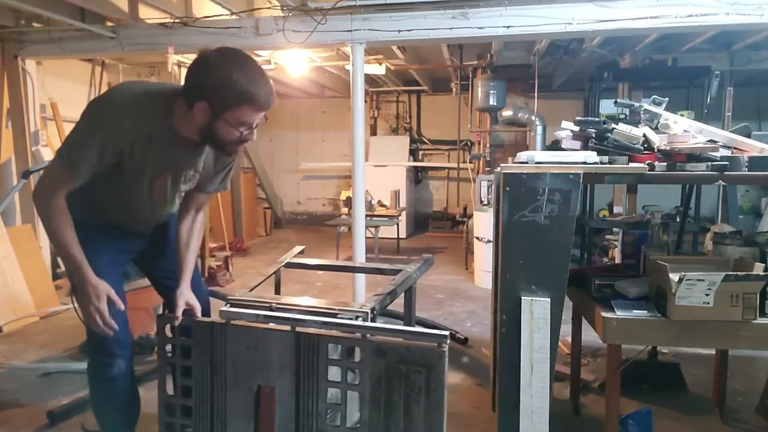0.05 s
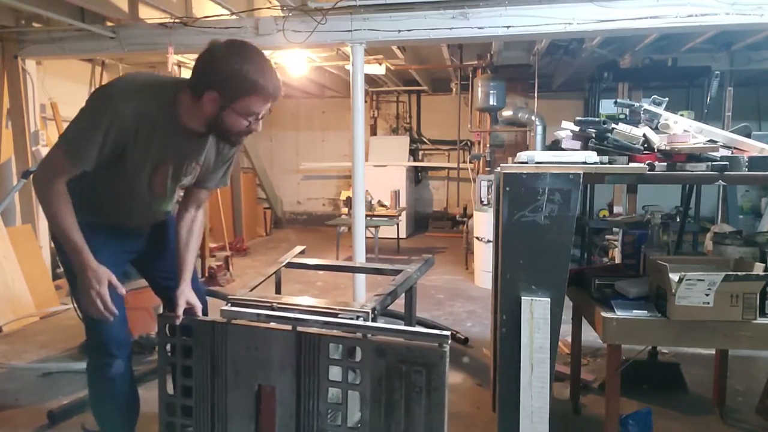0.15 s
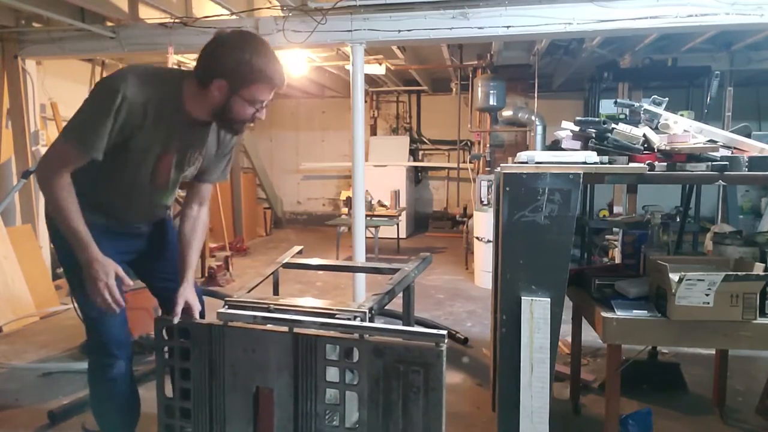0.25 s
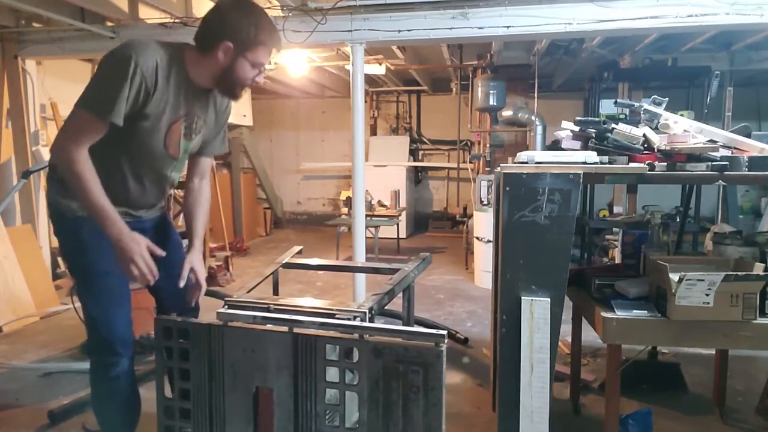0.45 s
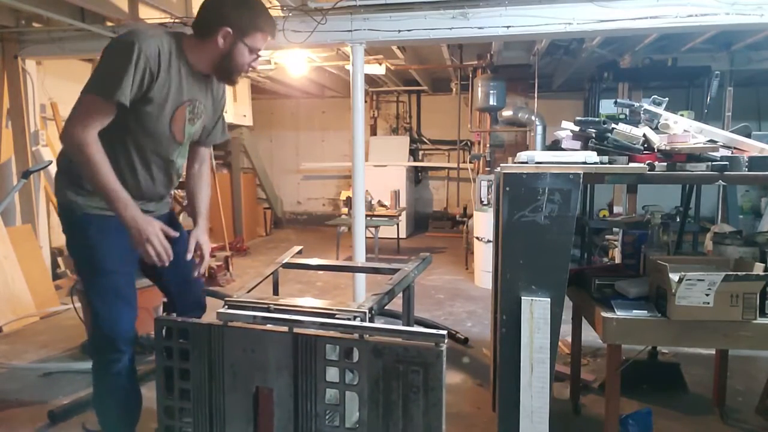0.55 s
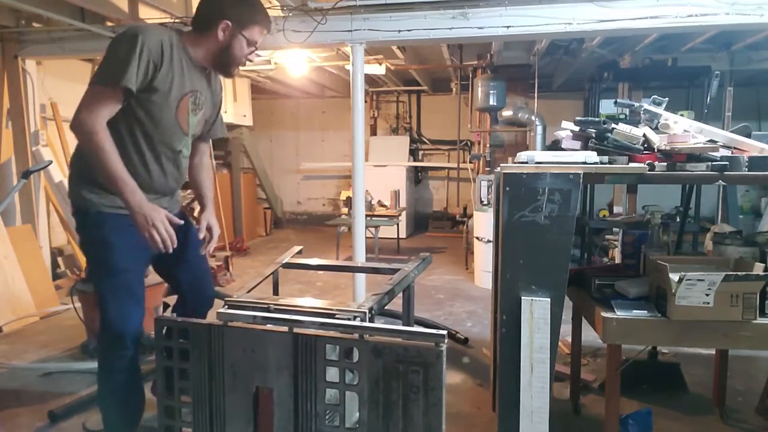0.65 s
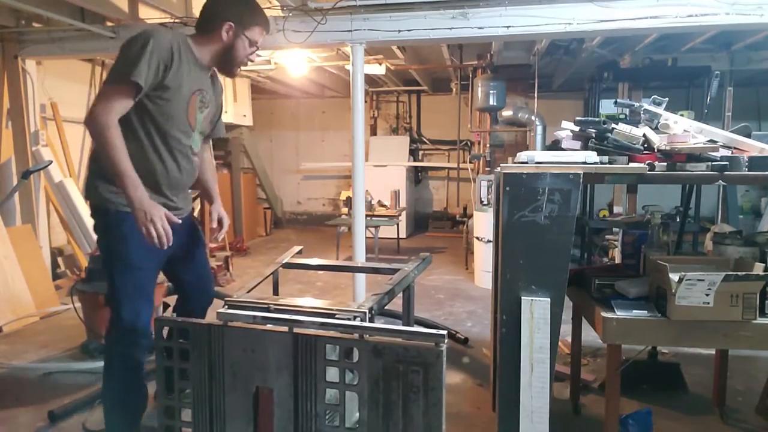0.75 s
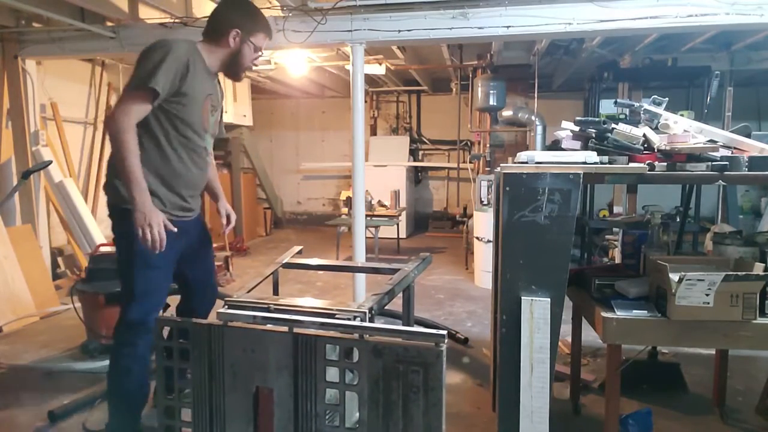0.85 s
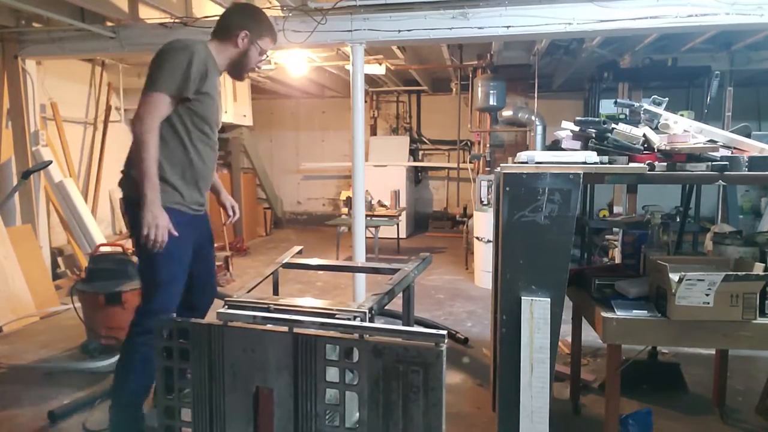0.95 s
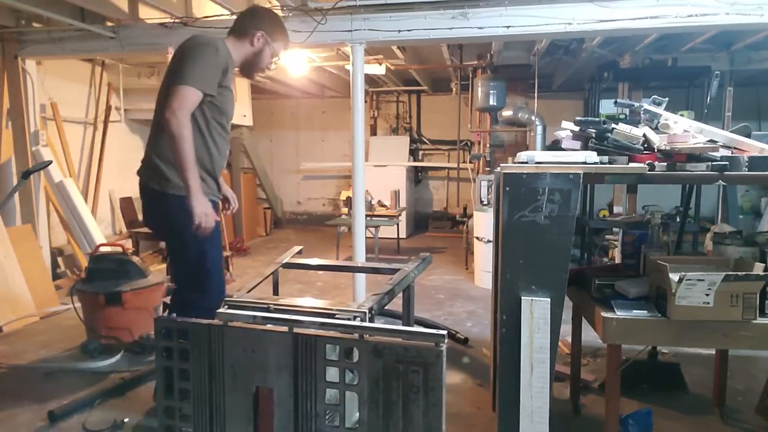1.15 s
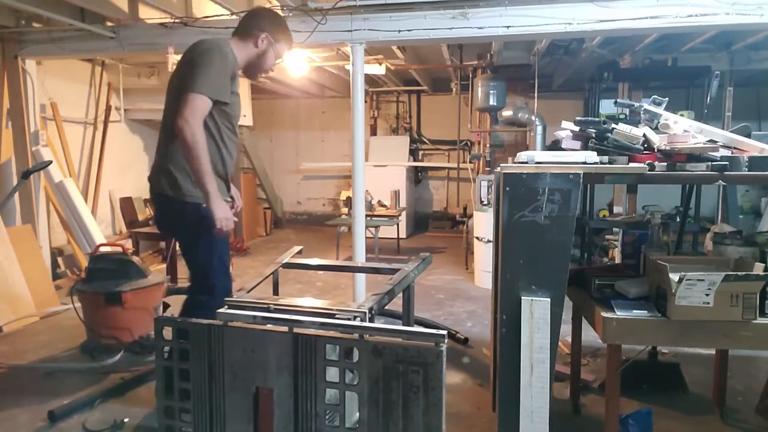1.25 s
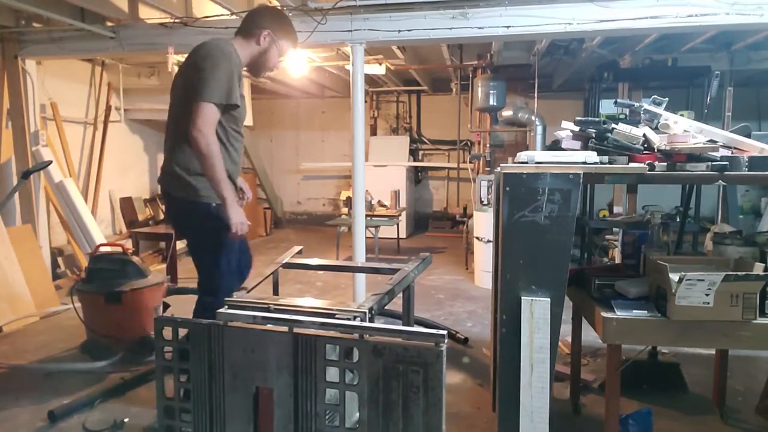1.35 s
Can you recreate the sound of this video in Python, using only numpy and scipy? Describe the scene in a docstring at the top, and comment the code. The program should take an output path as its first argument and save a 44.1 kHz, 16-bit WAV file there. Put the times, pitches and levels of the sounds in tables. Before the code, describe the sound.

A heavy steel frame slams onto a concrete floor with a boom and ringing clash.

```python
"""A heavy steel machine frame is let down on a basement workshop's concrete floor, two metres away.
It knocks, catches on an edge and slams flat: the body booms, the panels clash and the low room rings on.
A step and a shoe scuff follow, then a lighter clack of metal from further off.
The stereo microphone hears it all a little to the left, over faint room noise."""
import sys
import numpy as np
from scipy import signal
from scipy.fft import rfft, irfft
from scipy.io import wavfile

SR = 44100
rng = np.random.default_rng(int(sys.argv[2]) if len(sys.argv) > 2 else 0)


def log_audio(samples):
    """Write samples as a 16-bit WAV file to the path given in sys.argv[1]."""
    # one column per channel
    frames = np.atleast_2d(samples).T
    # limit to full scale, then quantise
    limited = np.clip(frames, -1, 1)
    pcm = np.round(limited * 32767).astype(np.int16)
    wavfile.write(sys.argv[1], SR, pcm)


N = 61739

# reverberation of the basement: band_hz, t60_s
ROOM_DECAY = [(60, 0.73), (250, 0.64), (1000, 0.52), (3000, 0.49), (15000, 0.36)]
# stereo width at the microphone: frequency_hz, side_over_mid_db
STEREO_WIDTH = [(60, -25.5), (260, -13.5), (500, -6.5), (1000, -1)]


def undb(db):
    """Decibels to gain."""
    return 10 ** (np.asarray(db) / 20)


def level(x, db):
    """Scale to an rms level; levels set before this are only relative."""
    return x * undb(db) / np.sqrt(np.mean(x ** 2))


def lookup(table, hz):
    """Read a table on a log-frequency axis."""
    freqs, values = np.array(table, float).T
    return np.interp(np.log(np.maximum(hz, 1)), np.log(freqs), values)


def fade(t60):
    """Exponential decay, 60 dB in t60 seconds."""
    return np.exp(-np.log(1000) * np.arange(N) / SR / max(t60, 1e-3))


def rise(seconds):
    """Build-up from silence to 1."""
    return 1 - np.exp(-np.arange(N) / SR / max(seconds, 1e-5))


def swell(middle_s, width_s):
    """A smooth rise and fall."""
    return np.exp(-.5 * ((np.arange(N) / SR - middle_s) / width_s) ** 2)


def place(x, start_s):
    """Shift a sound to its start; a negative time cuts off its beginning."""
    shift = int(start_s * SR)
    late, early = max(shift, 0), max(-shift, 0)
    padding = [(0, 0)] * (x.ndim - 1) + [(late, early)]
    return np.pad(x, padding)[..., early:early + N]


def through(x, response):
    """Convolve with an impulse response, channel by channel."""
    return irfft(rfft(x, 2 ** 17) * rfft(response, 2 ** 17))[..., :N]


def colour(x, spectrum, scatter_db=0):
    """Causal filter with the given spectrum; scatter_db adds a metal part's crowded peaks and dips."""
    size, peak_spacing_hz = 8192, 45
    hz = np.fft.rfftfreq(size, 1 / SR)
    grid = np.arange(0, SR / 2, peak_spacing_hz)
    peaks = np.interp(hz, grid, rng.standard_normal(len(grid))) * np.minimum(hz / 1000, 1)
    cepstrum = irfft(np.log(undb(lookup(spectrum, hz) + scatter_db * peaks)))
    cepstrum[1:size // 2] *= 2  # fold to minimum phase
    cepstrum[size // 2 + 1:] = 0
    return through(x, irfft(np.exp(rfft(cepstrum))))


def soften(x, hz):
    """A softer contact leaves out the highs."""
    return signal.sosfilt(signal.butter(2, min(hz, SR / 2 - 1000), fs=SR, output="sos"), x + 1e-18)


def resonance(x, hz, relative_width=0.22):
    """Band-pass around one resonance, gain 1 at its centre."""
    return signal.lfilter(*signal.iirpeak(hz, 1 / relative_width, fs=SR), x)


def ring(modes, rise_cycles=0):
    """Decaying sines that build up over some cycles; the high ones reach the two sides out of step."""
    t, out = np.arange(N) / SR, 0
    for hz, db, t60 in modes:
        skew = rng.uniform(1, 2) * np.pi / 6 * rng.choice([-1, 1]) * undb(lookup(STEREO_WIDTH, hz))
        tone = np.sin(2 * np.pi * hz * t + np.array([[skew], [-skew]]))
        out = out + undb(db) * rise(rise_cycles / hz) * fade(t60) * tone
    return out


def diffuse():
    """Stereo noise, alike in the bass and unrelated in the treble."""
    mid, side = rfft(rng.standard_normal((2, N)))
    width = undb(lookup(STEREO_WIDTH, np.fft.rfftfreq(N, 1 / SR)))
    return irfft((mid + np.array([[1], [-1]]) * width * side) / np.sqrt(1 + width ** 2), N)


def room_bands():
    """Diffuse noise split into the bands of the room's decay."""
    spectrum, hz = rfft(diffuse()), np.fft.rfftfreq(N, 1 / SR)
    centres_hz = [band_hz for band_hz, _ in ROOM_DECAY]
    shares = [lookup(list(zip(centres_hz, one_band)), hz) for one_band in np.eye(len(centres_hz))]
    return np.array([irfft(spectrum * share, N) for share in shares])


def in_room(bands, shape, direct_db):
    """Noise with this envelope and the room's tail after it; each call of the result gives a fresh one."""
    direct_power = shape ** 2 / np.sum(shape ** 2)
    room_power = np.array([(fade(t60) * rise(seconds=0.0042)) ** 2 for _, t60 in ROOM_DECAY])
    room_power /= room_power.sum(axis=1).mean()
    tail_power = np.maximum(through(direct_power, room_power), 0)
    envelope = np.sqrt(undb(direct_db) ** 2 * direct_power + tail_power)
    return lambda: np.einsum("bcn,bn->cn", np.roll(bands, rng.integers(N), axis=-1), envelope)


def striker(bands, t60_s, direct_db):
    """A strike excites countless short-lived modes that feed the room."""
    return in_room(bands, fade(t60_s) * rise(seconds=0.0024), direct_db)


def knocks(strike, rows):
    """One strike for each row that begins start_s, level_db, brightness_hz."""
    return sum(undb(db) * place(soften(strike(), hz), start_s) for start_s, db, hz, *_ in rows)


def panel_clash(bands):
    """Each blow on an edge of the frame sets the steel panels clashing and ringing with its own colour."""
    # blows on the edges: start_s, level_db, brightness_hz, resonance_hz, resonance_db
    blows = [(-0.012, -20.5, 4470, 2480, -7.5), (0.010, -26.5, 3526, 976, 15.5),
             (0.207, -12, 1897, 1020, 2.5), (0.215, -10.5, 1519, 1009, 13.5),
             (0.2214, -10, 3000, 2500, 1.5), (0.232, -7.5, 3360, 2560, -1.5), (0.2438, -5, 3465, 1780, 7.5),
             (0.2503, 1.5, 13790, 2140, -6), (0.2598, -8.5, 8000, 3020, -8.5),
             (0.2853, -3.5, 11000, 5650, -2.5)]
    # ringing modes of the panels: pitch_hz, level_db, t60_s
    panel_modes = [(950, -6, 0.23), (1055, -6.5, 0.44), (1715, -3, 0.22), (2085, -2, 0.27),
                   (2080, -0.5, 0.25), (2280, -12, 0.28), (2990, -1, 0.33), (3260, -4.5, 0.21),
                   (4786, -1, 0.32), (5742, -5, 0.28), (6120, -3, 0.22)]
    # dense clash of the panels: frequency_hz, density_db
    clash_spectrum = [(60, -29.5), (200, -5.5), (500, -0.5), (1100, -3.5), (3200, -0.5), (4400, -6.5),
                      (6000, -5.5), (7800, -15), (13000, -15.5), (16000, -21)]
    strike = striker(bands, t60_s=0.09, direct_db=-0.5)
    steel = ring(panel_modes)
    clash = ringing = 0
    for start_s, db, brightness_hz, resonance_hz, resonance_db in blows:
        hit = soften(np.array([strike(), steel]), brightness_hz)
        hit = hit + undb(resonance_db) * resonance(hit, resonance_hz)
        hit = undb(db) * place(hit, start_s)
        clash, ringing = clash + hit[0], ringing + hit[1]
    return level(colour(clash, clash_spectrum, scatter_db=1.7), -28) + level(ringing, -39.5)


def frame_landing(bands):
    """The frame's weight thumps the slab; the body booms freely when it slams flat."""
    # a bump, the slam, then rocking to rest: start_s, level_db, brightness_hz, body_share_db
    landings = [(-0.012, -9.5, 930, -14.5), (0.025, -5.5, 210, -27), (0.206, -20.5, 900, 2),
                (0.2431, 0.5, 1200, 5), (0.286, 2, 160, -19.5), (0.445, -11, 300, -28.5)]
    # low modes of the body: pitch_hz, level_db, t60_s
    body_modes = [(87, 4.5, .52), (120, -7, .7), (171.5, 1, .62), (269, 7, .42), (312, -1, .45),
                  (357, 5, .3), (411, -1, .66), (483, -8, .45), (542, -5, .68), (637, -6, .41),
                  (692, -5, .34)]
    # dull thump on the slab: frequency_hz, density_db
    thump_spectrum = [(20, -24.5), (45, -6), (80, 3.5), (205, -8.5), (300, 0), (600, -14.5), (2000, -44)]
    thump = knocks(striker(bands, t60_s=0.04, direct_db=1.5), landings)
    body = ring(body_modes, rise_cycles=3)  # low modes take longer to build up
    body_blows = [(start_s, db + share_db, hz) for start_s, db, hz, share_db in landings]
    boom = knocks(lambda: body, body_blows)
    return level(colour(thump, thump_spectrum), -37) + level(boom, -34.5)


def grating_edge(bands):
    """Grit catches and slips under a steel edge sliding over the concrete."""
    # slides of the edge: middle_s, half_length_s, level_db
    slides = [(0.008, 0.02, -73), (0.233, 0.007, -59.5), (0.249, 0.003, -52.5)]
    # rasp of the grit: frequency_hz, density_db
    grit_spectrum = [(300, -18), (3000, 0.5), (6000, -1.5), (8000, -5.5), (12000, -4), (16000, -4)]
    catches_per_s, scatter_db = 350, 3
    catch_index = (np.arange(N) / SR * catches_per_s).astype(int)
    catches = undb(scatter_db * rng.standard_normal(N))[catch_index]
    out = 0
    for middle_s, width_s, db in slides:
        rasp = in_room(bands, swell(middle_s, width_s) * catches, direct_db=1.5)()
        out = out + level(colour(rasp, grit_spectrum), db)
    return out


def footstep(bands):
    """Heel and sole come down on the concrete with short thuds."""
    # contacts of the shoe: start_s, level_db, brightness_hz, thud_hz, thud_db
    contacts = [(0.723, -0.5, 2512, 266, 4), (0.738, 3, 799, 560, -6.5), (0.7612, 4.5, 1391, 847, -10),
                (0.777, -2.5, 617, 299, 4.5), (0.779, -4.5, 400.5, 105, 9)]
    # tap of the shoe: frequency_hz, density_db
    shoe_spectrum = [(30, -5), (90, 0), (280, -2), (1100, -4.5), (4000, -7.5), (15000, 1)]
    taps = knocks(striker(bands, t60_s=0.036, direct_db=-4), contacts)
    thuds, thud_t60_s = 0, 0.041
    for start_s, db, _, thud_hz, thud_db in contacts:
        thud = ring([(thud_hz, db + thud_db, thud_t60_s)], rise_cycles=1)
        thuds = thuds + place(thud, start_s)
    return level(colour(taps, shoe_spectrum), -60) + level(thuds, -65)


def shoe_scuff(bands):
    """A shoe brushes the concrete in a soft swell."""
    # friction of the sole: frequency_hz, density_db
    scuff_spectrum = [(150, -4), (1400, -9), (3400, -3), (6000, -12.5), (15000, -41)]
    scuff = in_room(bands, swell(middle_s=0.8695, width_s=0.022), direct_db=1)()
    return level(colour(scuff, scuff_spectrum), -69.5)


def far_clack(bands):
    """A light metal piece knocks further off, rings and rebounds, heard mostly through the room."""
    # contacts of the piece: start_s, level_db, brightness_hz
    contacts = [(1.157, -4.5, 2960), (1.165, 0, 11740), (1.180, 3, 11000), (1.283, -12.5, 2620)]
    # clack of those contacts: frequency_hz, density_db
    clack_spectrum = [(150, -16), (450, -1.5), (1000, -5.5), (2500, 0), (4000, -5), (6000, -5), (8000, -15),
                      (16000, -9)]
    # ringing modes of the piece: pitch_hz, level_db, t60_s
    piece_modes = [(479, -7, .6), (1556, 0, .4), (1900, 0, .36), (2110, -1, .5), (2358, 1, .4),
                   (2584, 4, .48), (2875, -3, .5), (3101, -2, .36), (3467, -3, .42), (4651, -4, .3),
                   (5356, -7, .4)]
    hits = knocks(striker(bands, t60_s=0.066, direct_db=-7.5), contacts)
    clack = colour(hits, clack_spectrum, scatter_db=1.7)
    ringing = ring(piece_modes) * rise(seconds=0.019)  # builds up over the contacts
    return level(clack, -52) + level(place(ringing, start_s=1.165), -57.5)


def room_noise():
    """The basement's faint, steady rumble and hiss, left when the knocks die away."""
    # background of the room: frequency_hz, density_db
    air_spectrum = [(18, -32), (40, -6), (99, -5), (200, -18), (550, -22), (800, -14), (1300, -24),
                    (15000, -21.5)]
    return level(colour(diffuse(), air_spectrum), -75)


def scene():
    """All sources share one room and reach the left of the microphone a little louder and sooner."""
    left_over_right_db, right_lag_s = 1.33, 0.00018
    bands = room_bands()
    frame = panel_clash(bands) + frame_landing(bands) + grating_edge(bands)
    left, right = frame + footstep(bands) + shoe_scuff(bands) + far_clack(bands)
    tilt = undb(left_over_right_db / 2)
    return np.array([left * tilt, place(right, right_lag_s) / tilt]) + room_noise()


def record(dry):
    """The recorder cuts the deepest bass and the top."""
    low_cut_hz, top_hz = 23, 16000
    dry = signal.sosfilt(signal.butter(3, low_cut_hz, "high", fs=SR, output="sos"), dry)
    return signal.sosfilt(signal.ellip(10, .2, 80, top_hz, fs=SR, output="sos"), dry)


dry = scene()
out = record(dry)
log_audio(out)
```